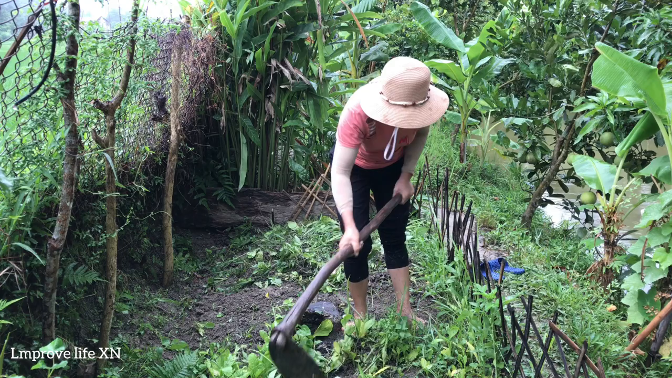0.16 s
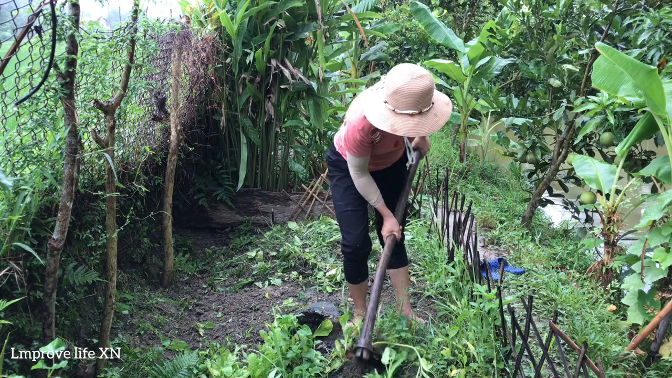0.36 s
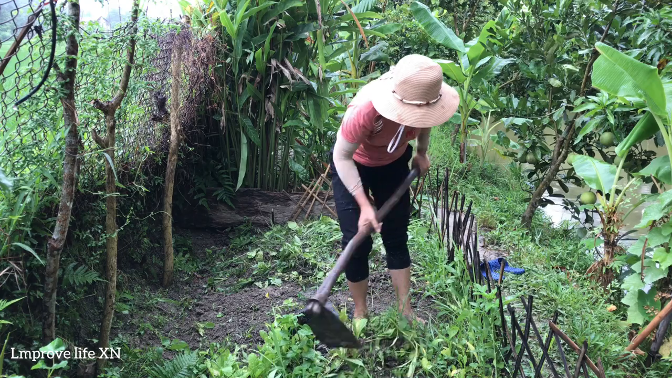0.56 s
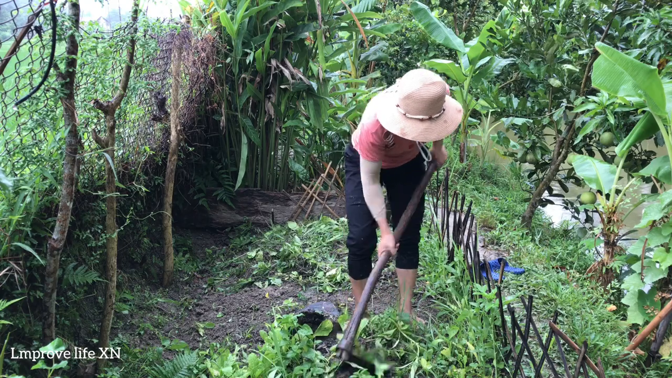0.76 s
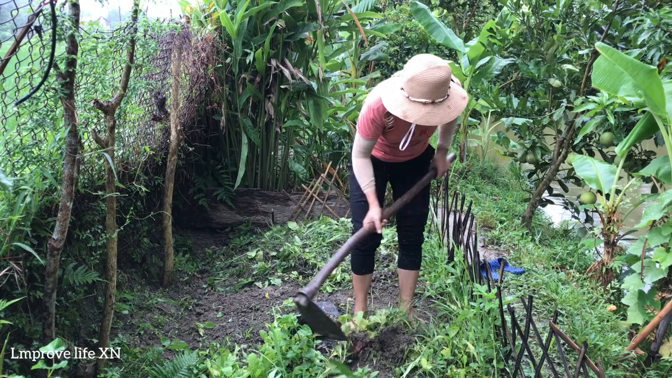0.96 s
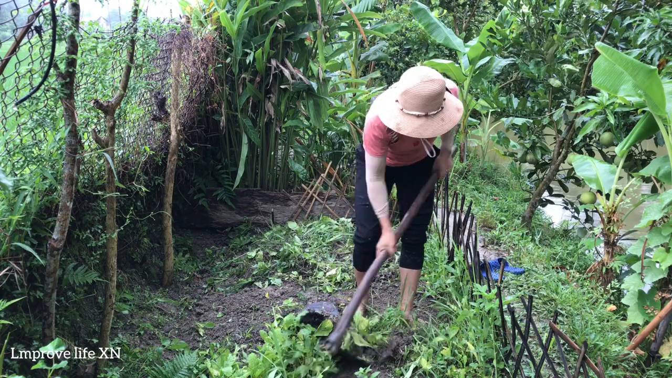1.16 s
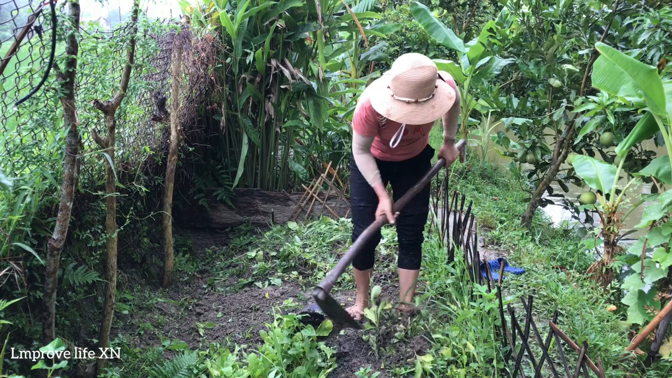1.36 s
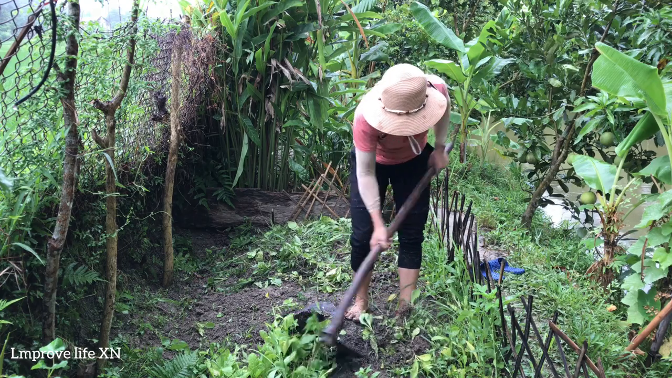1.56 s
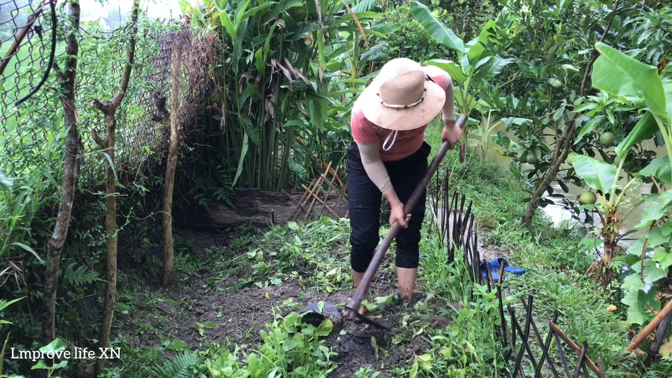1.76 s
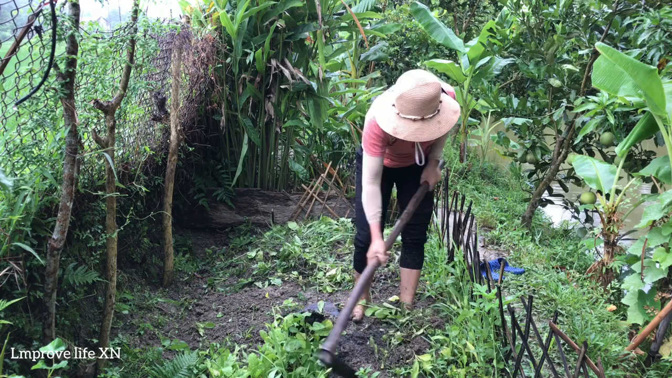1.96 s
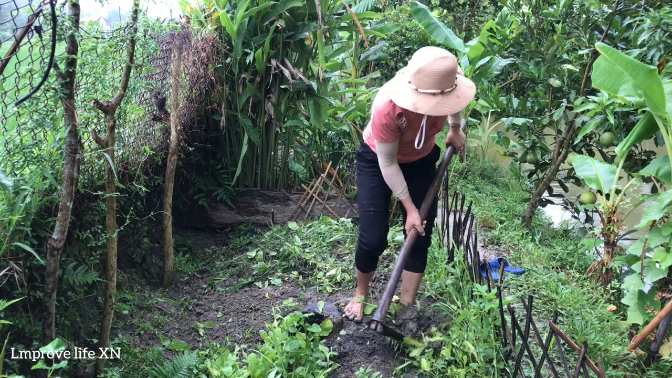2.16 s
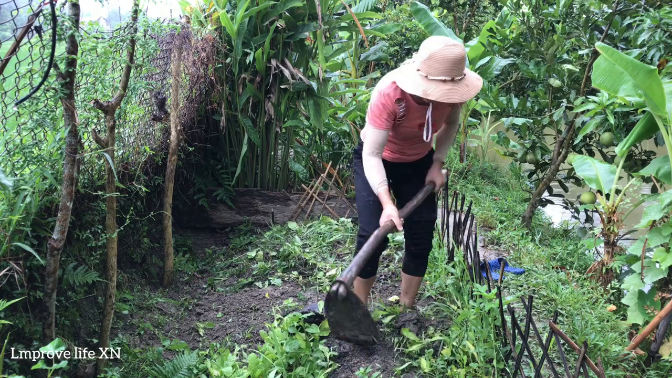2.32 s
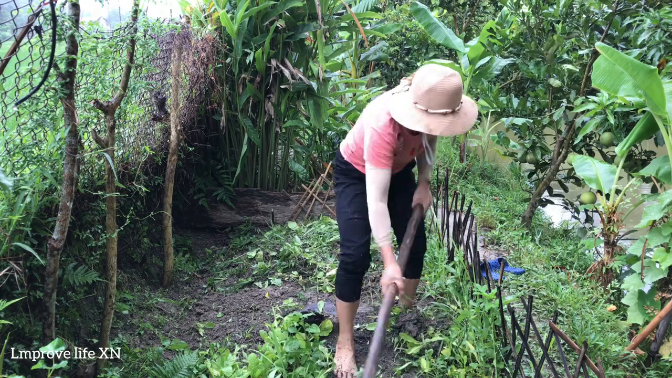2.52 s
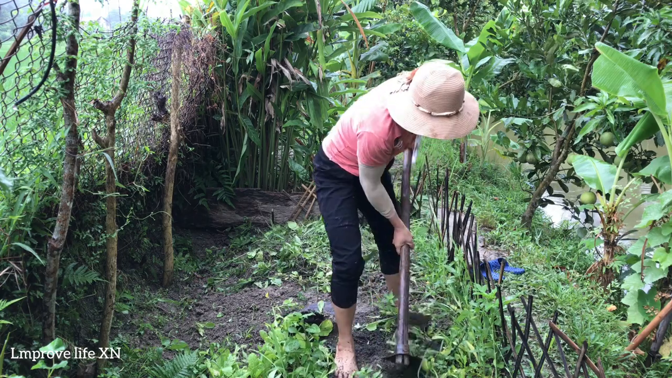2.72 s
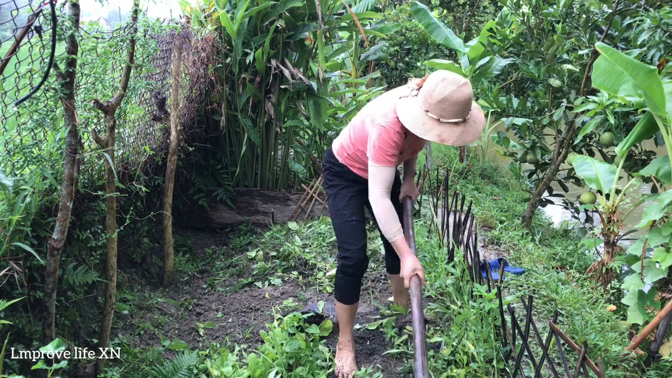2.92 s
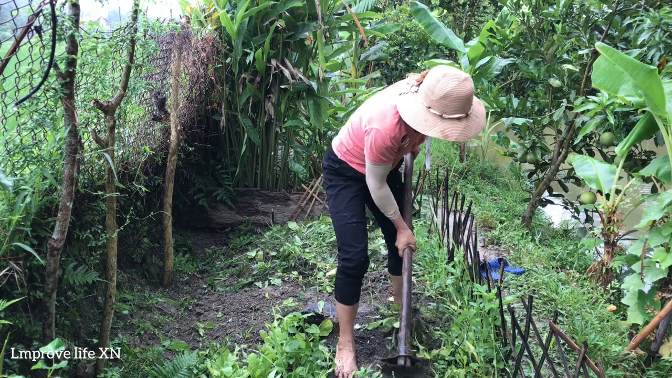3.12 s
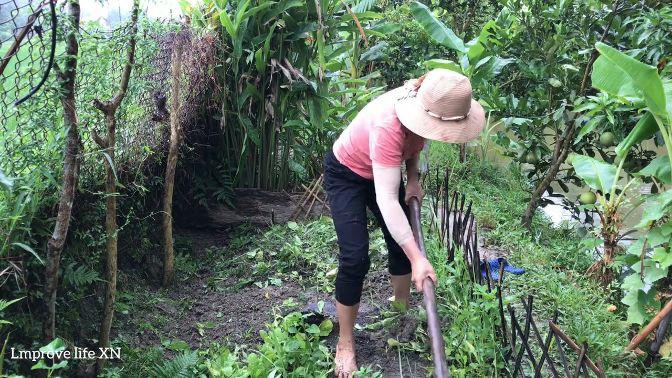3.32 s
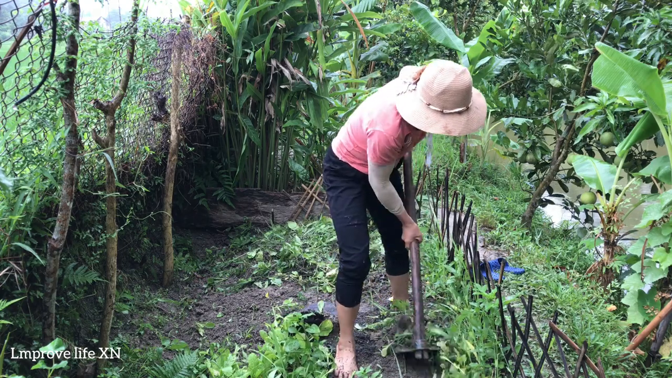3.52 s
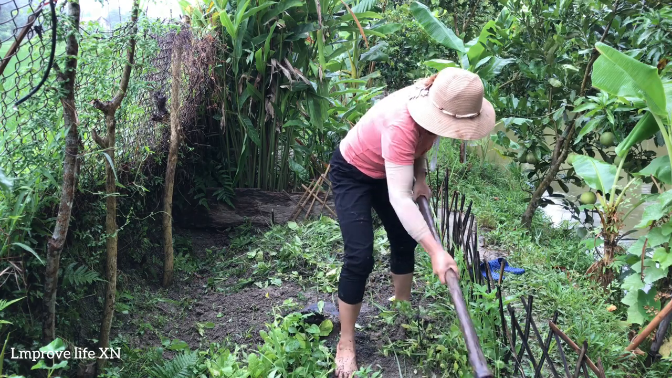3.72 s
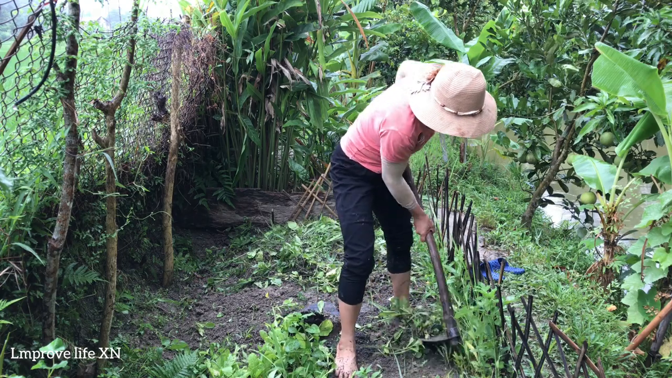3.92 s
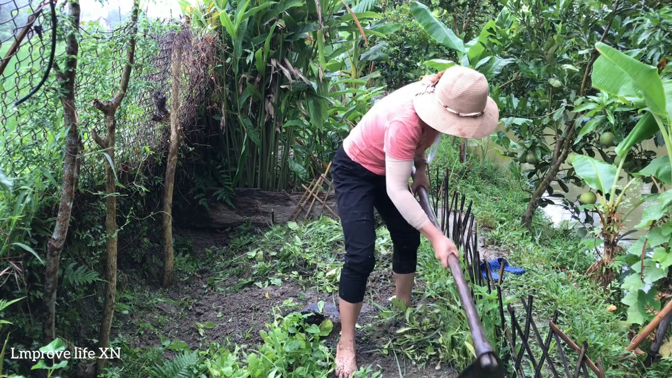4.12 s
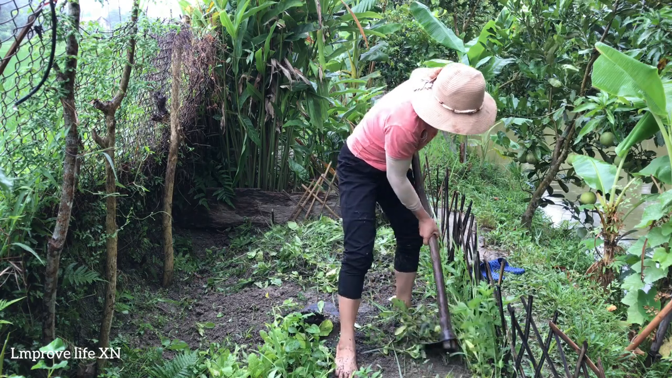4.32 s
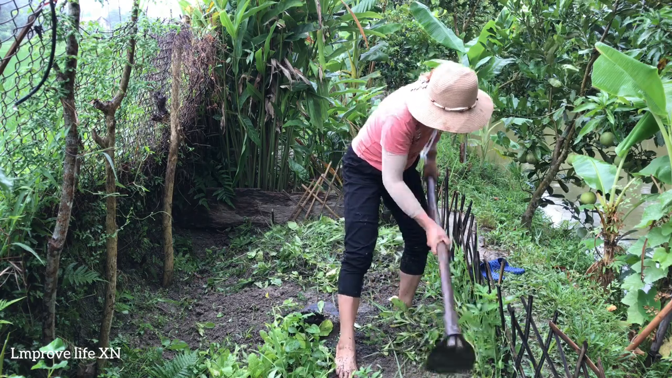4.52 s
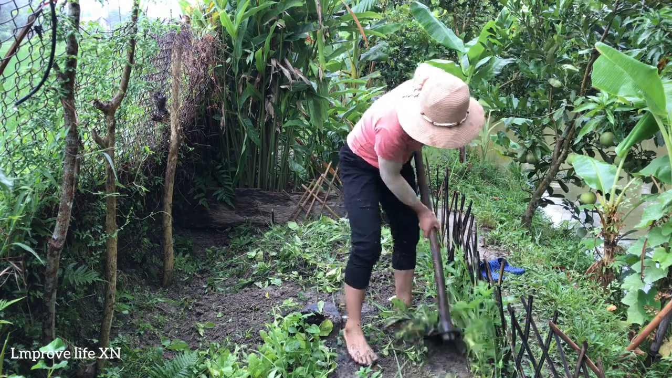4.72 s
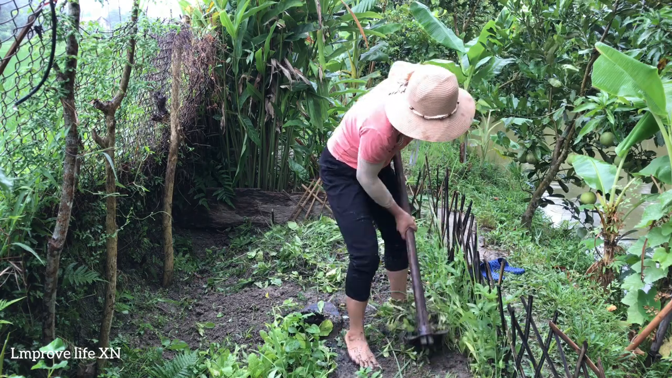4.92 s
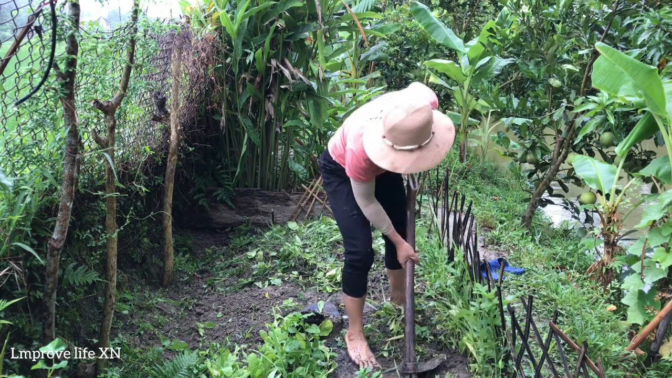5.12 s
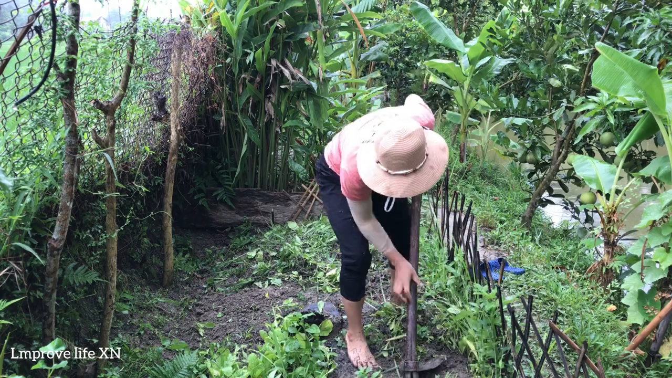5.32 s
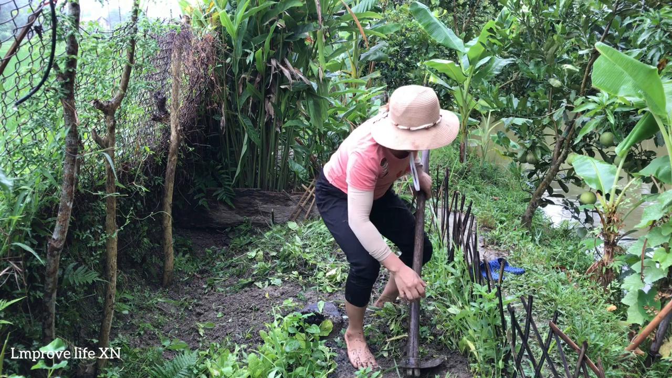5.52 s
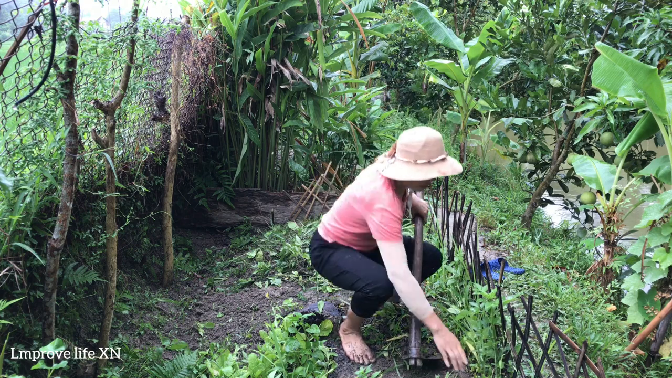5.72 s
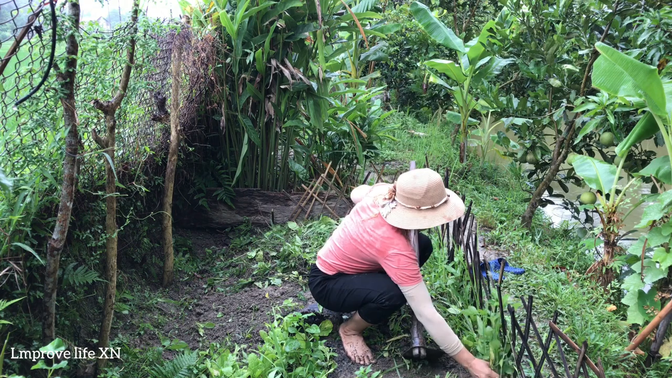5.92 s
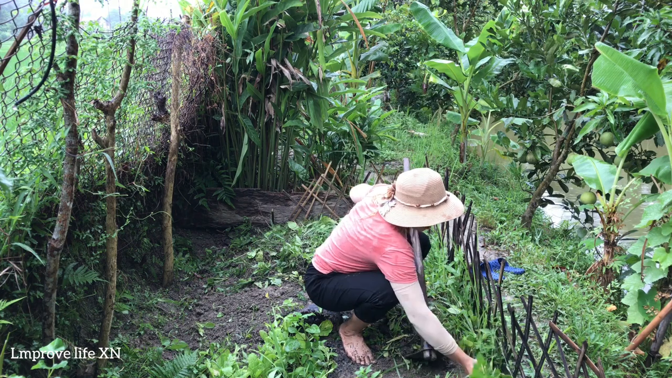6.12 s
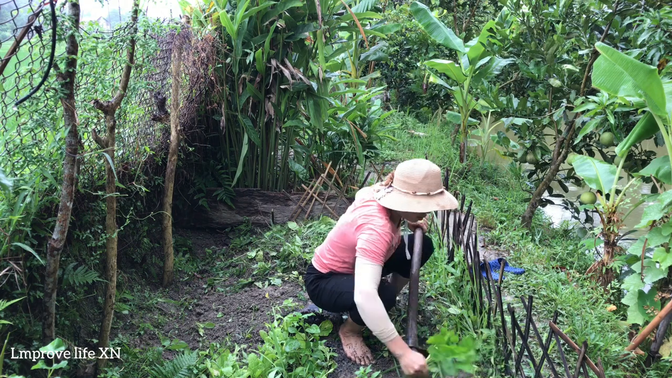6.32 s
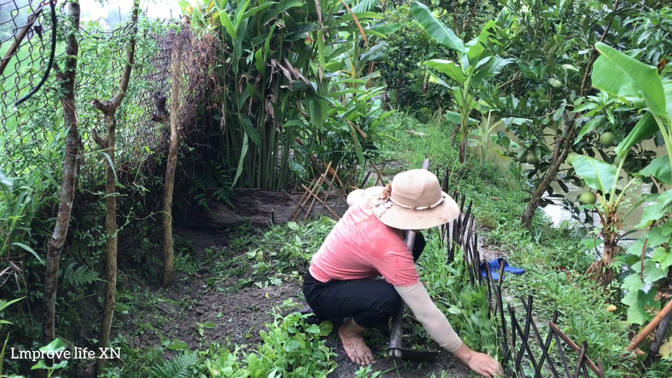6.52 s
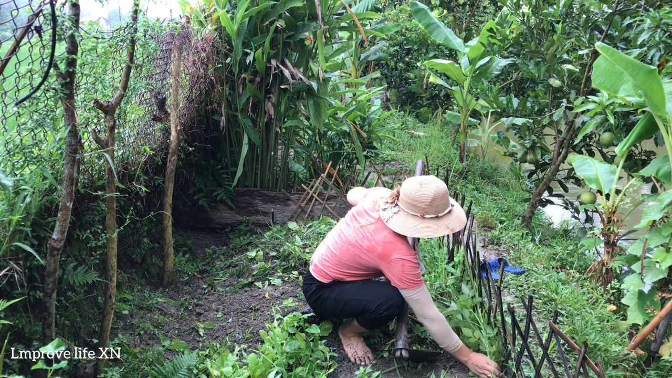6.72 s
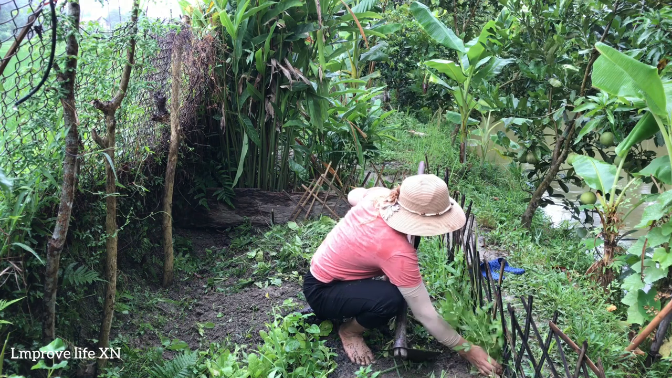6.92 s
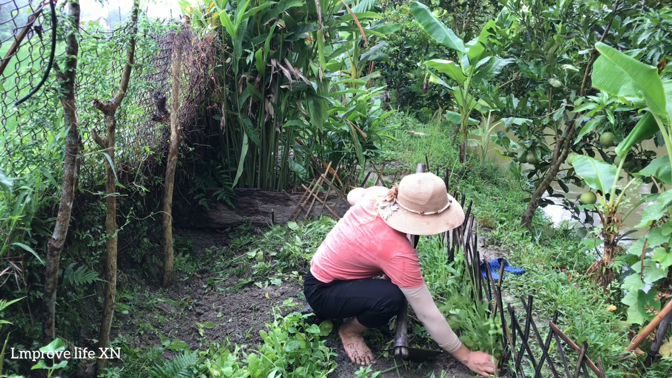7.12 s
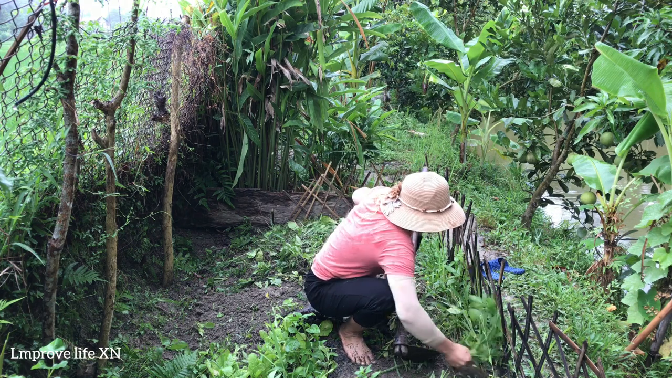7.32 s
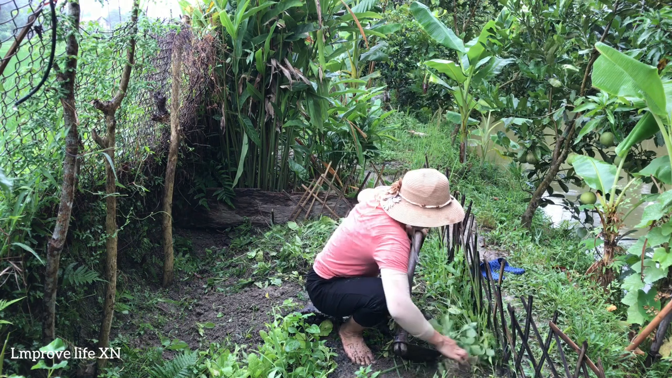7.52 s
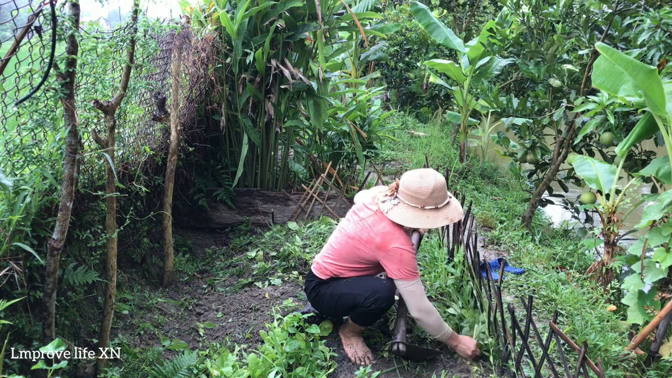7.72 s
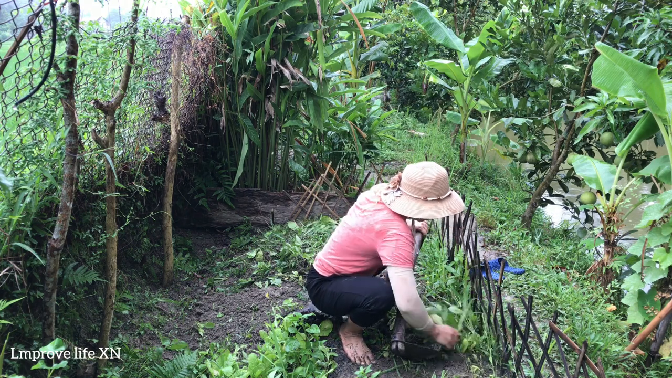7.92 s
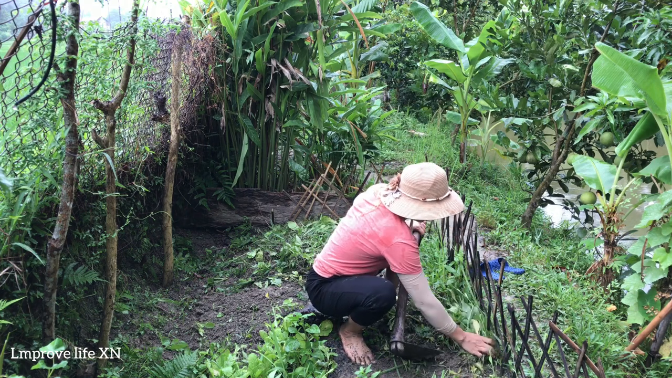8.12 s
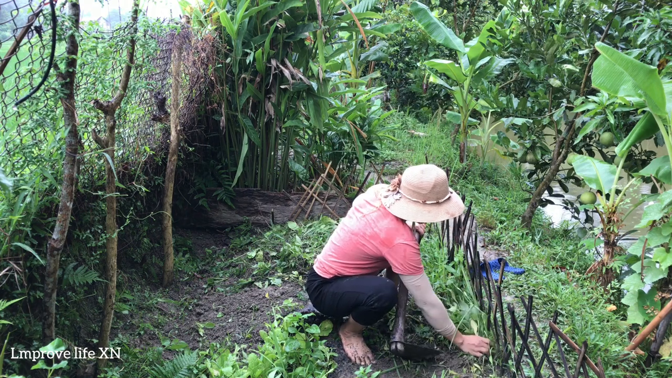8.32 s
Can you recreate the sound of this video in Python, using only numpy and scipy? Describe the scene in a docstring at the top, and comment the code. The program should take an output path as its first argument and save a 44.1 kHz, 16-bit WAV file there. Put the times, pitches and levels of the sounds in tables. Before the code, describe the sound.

Crunchy hoe strokes into earth with dull thuds and stony knocks, then quiet leaf rustling and stem snaps, over faint insects and a distant engine.

```python
"""Hoeing and weeding

A hoe chops eleven times through weeds into damp soil outdoors, then a hand pulls weeds.
Strokes and rustles are fractures and ringing crumbs, coloured as grit, clods and leaves and shaped in level.
Stems snap, stones knock the ringing steel blade, and the ground thuds and plops as damped low tones.
A small engine throbs far off as orders of its firing rate, under a noise bed of foliage and insects."""
import sys
import numpy as np
from scipy import signal
from scipy.fft import rfft, irfft, next_fast_len
from scipy.io import wavfile
from scipy.ndimage import uniform_filter1d

SR = 44100
rng = np.random.default_rng(int(sys.argv[2]) if len(sys.argv) > 2 else 0)


def transcribe(u):
    """Save the signal u as a 16-bit wav file named by the first command-line argument.

    u: samples, shape (n,) or (channels, n), limited to [-1, 1]; the rate is SR.
    q: integer samples, one column per channel.
    """
    v = np.clip(np.atleast_2d(u).T, -1, 1)
    q = np.round(v * 32767).astype(np.int16)
    wavfile.write(sys.argv[1], SR, q)


N = 368676  # samples


def gain_of(db):
    """Amplitude factor of a level in dB."""
    return 10 ** (np.asarray(db) / 20)


def evened(x):
    """Scales a signal to rms 1."""
    return x / np.sqrt(np.mean(x ** 2) + 1e-20)


def read(points, hz):
    """Reads a (frequency, level) curve along a logarithmic frequency axis."""
    f, value = np.transpose(points)
    return np.interp(np.log(hz + 1), np.log(f + 1), value)


def add(mix, s, sound):
    """Mixes a sound in at s seconds, cut off where the mix ends."""
    part = mix[round(s * SR):][:len(sound)]
    part += sound[:len(part)]


def coloured(x, spectrum):
    """Filters a signal by a (frequency [Hz], level [dB]) curve."""
    size = next_fast_len(len(x))
    gain = gain_of(read(spectrum, np.fft.rfftfreq(size, 1 / SR)))
    return irfft(rfft(x, size) * gain, size)[:len(x)]


def wander(hz):
    """Slow chance of rms 1, with hz random knots a second joined by straight lines."""
    knots = np.arange(0, N / SR + 1, 1 / hz)
    x = np.interp(np.arange(N) / SR, knots, rng.standard_normal(len(knots)))
    return evened(x - x.mean())


# Spectrum of the outdoor air, relative: (frequency [Hz], density [dB per Hz])
AIR_SPECTRUM = [(45, -20), (62, -5), (150, -1), (296, -10.5), (410, -10), (634, -14.5), (900, -14.5),
                (1180, -18.5), (1550, -16), (4480, -20), (5600, -19), (6400, -17), (7000, -21.5),
                (14800, -25.5), (16500, -36)]
# Swell of the air over its base level: (time [s], level [dB])
AIR_SWELL = [(0, 4), (2, 3), (4, 2.5), (6, 2.5), (7, 2.5), (8.36, 4)]
AIR_BASE_DB = -59


def air():
    """Foliage, insects and far rumble: random short-time spectra with drifting patches."""
    frames, hz = N // 256 + 5, np.fft.rfftfreq(1024, 1 / SR)
    real, imaginary, patches = rng.standard_normal((frames, 513, 3)).T
    patches = uniform_filter1d(patches, size=14, axis=0)  # across frequency
    patches = evened(uniform_filter1d(patches, size=12, axis=1))  # across time
    level_db = read(AIR_SPECTRUM, hz)[:, None] + 1.3 * patches
    spectra = (real + 1j * imaginary) * gain_of(level_db)
    noise = signal.istft(spectra, nperseg=1024, noverlap=768)[1][:N]
    swell_db = np.interp(np.arange(N) / SR, *np.transpose(AIR_SWELL)) + 0.48 * wander(8.9)
    return gain_of(AIR_BASE_DB + swell_db) * evened(noise)


def chips(lo_hz, hi_hz, cycles, per_s, spread_db):
    """Crumbs of 16 sizes, each ringing a few cycles at its own pitch."""
    out, draw = np.zeros(N), rng.random((2, N))
    at = np.flatnonzero(draw[0] < per_s / SR)
    kind = rng.integers(0, 16, N)
    for k, hz in enumerate(np.geomspace(lo_hz, hi_hz, num=16)):
        turns = np.arange(int(3 * cycles * SR / hz) + 2) * hz / SR
        train, mine = np.zeros(N), at[kind[at] == k]
        train[mine] = gain_of(-spread_db * np.log(draw[1, mine] + .02))  # a few land much louder
        chip = turns * np.exp(-3 * turns / cycles) * np.sin(2 * np.pi * turns)
        out += signal.oaconvolve(train, chip / np.linalg.norm(chip))[:N]
    return evened(out)


def garden():
    """Loose crumbs roll and leaves tick all the while, sparse and faint."""
    return gain_of(-70 + 3.2 * wander(12)) * chips(1490, 12100, 3.7, 500, 4.2)


# Far engine, level before a common trim: (time [s], firing rate [per s], level [dB])
ENGINE = [(0, 29.2, -54), (.42, 28.9, -52.5), (.95, 29.5, -54), (3.1, 30.1, -56), (4.2, 29.3, -57.5),
          (4.9, 29.5, -59.5), (6.4, 28.8, -61), (7.5, 28.4, -61), (8.36, 28.5, -59)]
# Orders of the exhaust, relative: (multiple of the firing rate [-], level [dB])
EXHAUST_ORDERS = [(1, -46), (2, -8.5), (3, -16), (4, -4), (5, 1.5), (6, 1.5), (7, -1), (8, -10.5), (9, -17)]
ENGINE_TRIM_DB = -1.6


def engine():
    """Exhaust pulses as orders of the firing rate, each wavering on its way through the air."""
    s, hz, db = np.transpose(ENGINE)
    t = np.arange(N) / SR
    firing_hz = np.interp(t, s, hz) * (1 + 0.00603 * wander(11))
    turns = np.cumsum(firing_hz) / SR
    orders = np.zeros(N)
    for k, order_db in EXHAUST_ORDERS:
        level = gain_of(order_db + 1.75 * wander(8))
        orders += level * np.cos(2 * np.pi * k * turns + 0.095 * k * wander(4.4))
    return gain_of(np.interp(t, s, db) + ENGINE_TRIM_DB) * evened(orders)


def crackle(per_s, spread_db, clump_db):
    """Tiny fractures of uneven size that come in clumps a few milliseconds long."""
    draw = rng.random((3, N))
    size = gain_of(-spread_db * np.log(draw[0] + 0.0018)) * np.sign(draw[1] - .5)
    struck = draw[2] < per_s / SR
    return evened(size * struck * gain_of(clump_db * wander(320)))


ENTRY_S, STOP_DB_PER_S = 0.004, 700  # rise at entry, steepness of the drop after the stop
SPILL_SAG_DB, SETTLE_S, CRUMBS_DB, CRUMBS_S, SILENT_DB = 6.5, 0.027, -64, 0.13, -98
CLODS_CUT_DB, CLODS_SPILL_DB = -3.5, -4  # clods break mostly where the blade stops
LEAVES_CUT_DB, LEAVES_STOP_DB, LEAVES_SPILL_DB = 5, -2.5, 0.5  # against grit


def stroke(stop, force_db, cut, entry_db, hold, spill_db, spill, clods_db):
    """Corners of grit, clod and leaf level through one stroke: entry, cut, stop, spill, last crumbs."""
    drop = max(force_db - spill_db, 1) / STOP_DB_PER_S
    s = np.cumsum([stop - cut - ENTRY_S, ENTRY_S, cut, hold, drop, spill, SETTLE_S, CRUMBS_S])
    grit = np.array([SILENT_DB, entry_db, force_db, force_db,
                     spill_db, spill_db - SPILL_SAG_DB, CRUMBS_DB, SILENT_DB])
    phase = np.array([0, 0, 1, 1, 2, 2, 2, 2])  # cut, stop, spill
    clods = clods_db + np.array([CLODS_CUT_DB, 0, CLODS_SPILL_DB])[phase]
    leaves = np.array([LEAVES_CUT_DB, LEAVES_STOP_DB, LEAVES_SPILL_DB])[phase]
    return s, grit, grit + clods, grit + leaves


RUSTLE_RANGE_DB = 20  # from the foot of a swell to its top


def rustle(s, force_db, swell, fade, clods_db, leaves_db):
    """Corners of grit, clod and leaf level through one rustle: a swell and a fade."""
    grit = force_db - RUSTLE_RANGE_DB * np.array([1, 0, 1])
    return np.array([s - swell, s, s + fade]), grit, grit + clods_db, grit + leaves_db


# The blade cuts in with growing force, stops, and loose soil spills: (stop time [s], force [dB],
# cut [s], force at entry [dB], hold [s], spill [dB], spill [s], clods against grit [dB], thud [dB])
STROKES = [(.319, -39, 0.079, -63.5, 0.0053, -51, 0.079, -3, -28.5),
           (0.762, -54, 0.029, -63, 0.063, -61, 0.057, 1, -32.5),
           (1.177, -37.5, 0.045, -69, .006, -47, .04, -4.5, -33),
           (1.602, -38, 0.0037, -62, 0.005, -51.5, 0.071, -3.5, -44),
           (2.027, -47.5, 0.0068, -48.5, 0.031, -51, 0.028, -2.5, -47),
           (2.573, -37.5, 0.047, -52, 0.017, -50.5, 0.034, -6, -41),
           (3.009, -42.5, 0.048, -54.5, 0.0091, -52, 0.035, -2.5, -36),
           (3.409, -36, 0.044, -59.5, 0.003, -49, 0.07, -4.5, -37),
           (3.812, -40, 0.032, -60, .03, -42, 0.051, -6, -46),
           (4.26, -41.5, 0.073, -66.5, 0.0077, -48.5, 0.05, -2, -46),
           (4.681, -43.5, 0.044, -68, 0.0094, -51.5, 0.067, -4.5, -41)]
# Weeds are brushed, tugged and dropped: (time of the top [s], force [dB], swell [s], fade [s],
# clods against grit [dB], leaves against grit [dB])
RUSTLES = [(.68, -53, .008, 0.061, -19, -17), (1.558, -50.5, .015, 0.09, -1.5, 0.5),
           (1.779, -56, 0.024, .12, -5, -20), (2.658, -49, .02, 0.035, -5, -15),
           (3.62, -62, 0.097, 0.18, -1, -2), (3.74, -60, 0.051, 0.049, 0, -16),
           (4.04, -60, 0.06, 0.077, -24, 8.5), (4.11, -54, .02, 0.02, -21, -2),
           (4.899, -58, .02, 0.036, -15, -4), (4.98, -59, 0.016, .04, -4, -18),
           (5.134, -66, 0.015, 0.049, -3, -19), (5.66, -64, .08, 0.044, -15, 0),
           (5.78, -60, 0.044, 0.043, -15, 4), (6.0, -69, .1, 0.098, -10, 11),
           (6.12, -57, 0.14, 0.026, -9, 1), (6.158, -60, 0.01, 0.032, 8, 14),
           (6.254, -60, 0.065, 0.063, -8, 5), (6.5, -60, 0.067, 0.08, -10, 0),
           (6.595, -56.5, .01, 0.051, -16, -4), (7.323, -54.5, 0.06, 0.089, -5, -4),
           (7.397, -57, 0.073, 0.07, -25, 4.5), (7.61, -63, .02, .04, -6, -8),
           (7.743, -56, 0.21, .08, -16, 1), (7.892, -58, 0.2, 0.046, -23, 5),
           (7.939, -47.5, 0.018, 0.032, -24, -5), (7.962, -58.5, 0.0072, 0.059, 9, -12),
           (7.995, -57, 0.037, .04, 7.5, -18), (8.05, -63, 0.047, .04, 9.5, -13),
           (8.09, -62, 0.036, .04, 4, -18), (8.135, -61, .03, 0.045, 9, -21),
           (8.195, -57, 0.055, 0.029, -7, -23), (8.29, -54.5, .08, 0.067, -15, 1)]
# Colour of crushed grit: (frequency [Hz], level [dB])
GRIT = [(700, -41), (1200, 1), (1600, 1), (2500, 0.5), (4000, 4.5), (5500, 2), (8000, -5), (12000, -5)]
# Colour of breaking clods: (frequency [Hz], level [dB])
CLODS = [(120, -18), (300, -5), (500, -7), (850, 6), (1200, -13), (1800, -5.5), (3000, -10)]
# Colour of tearing leaves: (frequency [Hz], level [dB])
LEAVES = [(3000, -11), (5000, -1), (7000, 0), (10000, 4), (13000, -4.5), (16000, 0)]


def crunch():
    """Strokes and rustles crush grit, clods and leaves, each with its own grain and colour."""
    t, levels = np.arange(N) / SR, np.zeros((3, N))
    gestures = [stroke(*row[:-1]) for row in STROKES] + [rustle(*row) for row in RUSTLES]
    for s, *dbs in gestures:
        a, b = round(s[0] * SR), min(round(s[-1] * SR), N)
        for k, db in enumerate(dbs):
            level = gain_of(np.interp(t[a:b], s, db))
            levels[k, a:b] = np.hypot(levels[k, a:b], level)  # overlapping gestures add in power
    shared = crackle(7000, 2.6, 2.0)  # a fracture is heard in all three
    tearing = shared + 1.7 * crackle(8500, 1.5, 3.8)
    grit = evened(coloured(shared, GRIT)) + 0.83 * chips(1377, 6420, 7.5, 2500, 4.7)
    clods = evened(coloured(shared, CLODS)) + 0.79 * chips(289, 1370, 1.0, 900, 0.93)
    leaves = evened(coloured(tearing, LEAVES)) + 0.48 * chips(5780, 13800, 13.0, 3000, 7.2)
    return sum(level * evened(x) for level, x in zip(levels, (grit, clods, leaves)))


# Stems snap and pebbles click: (time [s], peak [dB], pitch [Hz], crack against ring before a lift [dB])
SNAPS = [(0.3014, -27, 9550, -3), (0.3141, -19, 1440, 13), (0.3177, -10.5, 10060, -15),
         (.3246, -24, 2620, -15), (0.372, -39, 2060, -6), (.529, -49, 1454, -18), (0.6733, -41, 4400, -8),
         (.688, -42, 5150, -8), (.7389, -39, 3900, 2), (.7608, -31, 2500, 7), (1.348, -44.5, 1640, -12),
         (1.496, -39.5, 3900, 7), (1.552, -36.5, 4260, -3), (2.021, -33.5, 1370, 2),
         (2.0574, -36.5, 1640, -17), (2.203, -46, 3040, -2), (2.528, -32, 10800, 1),
         (2.5842, -28, 1704, -6), (2.6442, -37.5, 2130, -13), (2.9574, -32, 12800, -3),
         (3.02, -31, 1530, -1), (3.0658, -36, 3560, 2), (3.157, -39.5, 4880, -6), (3.26, -50, 1640, -19),
         (3.3782, -39, 2040, 10), (3.7758, -33.5, 8660, -1), (3.8155, -35, 1470, -6),
         (3.838, -38, 3160, -13), (4.235, -27, 4400, -2), (4.651, -38, 10500, 0), (4.6764, -34.5, 1480, 1),
         (4.692, -29, 4560, -10), (4.883, -35.5, 3980, 12), (5.125, -41.5, 2700, -4),
         (5.135, -41, 3660, -9), (5.2834, -46.5, 1480, 4), (5.449, -41, 8920, -4),
         (5.6416, -40.5, 10150, -2), (5.989, -38, 11200, -3), (6.075, -41, 8000, 8), (6.1183, -39, 6940, 4),
         (6.1272, -35, 5200, -1), (6.1462, -32, 7500, 6), (6.1554, -31, 3080, 17), (6.251, -37.5, 4140, 6),
         (6.365, -45.5, 2220, 6), (6.508, -42, 5500, 6), (6.666, -47, 2230, 6), (7.305, -33, 12600, -1.5),
         (7.318, -34, 8900, 1), (7.3383, -33, 8200, 0), (7.394, -43, 2300, -18), (7.7794, -37, 10970, -7),
         (7.892, -39, 5200, -6), (7.932, -28, 4600, -2.5), (8.133, -45, 2030, -12), (8.197, -43, 2760, -13),
         (8.306, -47, 1830, -20)]
SNAP_T60_S, SNAP_PIECE_HZ, SNAP_SIZE_LAW = 0.037, 2500, 0.76  # small pieces die sooner
SNAP_DB_SHORTENS, CRACK_LIFT_DB = 0.04, 3  # hard snaps die sooner


def snaps():
    """A wide crack of splintering fibres and a short ring at the pitch of the piece that broke."""
    out, t = np.zeros(N), np.arange(4000) / SR
    noises = rng.standard_normal((len(SNAPS), 2, len(t)))
    for (s, db, hz, crack_db), noise in zip(SNAPS, noises):
        t60 = SNAP_T60_S * (SNAP_PIECE_HZ / hz) ** SNAP_SIZE_LAW
        t60 *= np.exp(-SNAP_DB_SHORTENS * (db + 36))
        dying = gain_of(-60 * t / max(t60, .002)) * np.minimum(t / (.02 * t60), 1)
        rough = 1 + 0.68 * evened(uniform_filter1d(noise[0], size=40))
        band = [0.24 * hz, min(2.34 * hz, 18000)]
        crack = signal.sosfilt(signal.butter(2, band, "band", fs=SR, output="sos"), noise[1])
        ring = rough * np.sin(2 * np.pi * hz * t)
        snap = (ring + gain_of(crack_db + CRACK_LIFT_DB) * evened(crack)) * dying
        add(out, s, gain_of(db) * snap / abs(snap).max())
    return out


# Modes of the free steel blade: (frequency [Hz], level before brightness tilt [dB], free ring t60 [s])
BLADE = [(1480, 2.5, 0.031), (1874, 10.5, 0.013), (2470, 11.5, 0.016), (3160, 1.5, 0.013),
         (3746, 15, 0.017), (5200, 11, 0.029), (6450, -8, 0.013), (8140, 15, 0.013), (8000, -1, 0.053),
         (9550, 9, 0.017), (10500, 3, .02), (12100, -13, .02)]


def blade(tilt_db, ring):
    """The answer of the steel to one tap; soil around it shortens the ring."""
    t = np.arange(3000) / SR
    answer = np.zeros(len(t))
    for hz, db, t60 in BLADE:
        mode_db = db + tilt_db * np.log2(hz / 3000) - 60 * t / (t60 * max(ring, .1))
        answer += gain_of(mode_db) * np.sin(2 * np.pi * hz * t)
    return answer


# The blade meets a stone: (time [s], peak before the bass cut [dB], brightness [dB per octave], contact [ms])
KNOCKS = [(0.3183, -9.5, -1.5, 1.1), (1.179, -17, 18, 0.13), (1.6037, -23, -4, 1.2), (2.567, -17, 6, 0.79),
          (3.001, -19.5, 12, 1.3), (3.0044, -17, -12, 0.74), (3.4133, -19, -17, 0.41),
          (4.2613, -9, -0.9, 1.8)]
BURIED_RING, RING_PER_MS = 0.21, .2  # share of the free ring time; a long contact leaves the blade freer


def knocks():
    """The stone cracks while the contact lasts and the blade rings on; the knocks carry no bass."""
    out, t = np.zeros(N), np.arange(400) / SR
    noises = rng.standard_normal((len(KNOCKS), len(t)))
    for (s, db, tilt_db, ms), noise in zip(KNOCKS, noises):
        contact = noise * (t / ms) * np.exp(-2000 * t / ms)
        contact /= abs(contact).max()
        taps = np.eye(1, len(t))[0] + 0.17 * contact  # the first touch, then chatter
        steel = np.convolve(taps, blade(tilt_db, BURIED_RING + RING_PER_MS * ms))
        blow = steel / abs(steel).max()
        add(blow, 0, gain_of(2.5 * tilt_db - 5) * contact)  # bright knocks crack more
        add(out, s, gain_of(db) * blow / abs(blow).max())
    return signal.sosfilt(signal.butter(3, 1150, "high", fs=SR, output="sos"), out)


def thump(db, hz, t60, rise_ms):
    """A soft low blow that swells for a few milliseconds."""
    t = np.arange(9000) / SR
    rise = 1 - np.exp(-(1000 * t / rise_ms) ** 2)
    return gain_of(db - 60 * t / t60) * rise * np.sin(2 * np.pi * hz * t)


def plop(s, db, swell, fade, first_hz, last_hz):
    """Start time and sound of a bell-shaped swell of one sliding tone."""
    t = np.arange(-swell, fade, 1 / SR)
    hz = np.geomspace(first_hz, last_hz, len(t))
    bell_db = -30 * np.abs(t / np.where(t < 0, swell, fade)) ** 1.5
    return s - swell, gain_of(db + bell_db) * np.sin(2 * np.pi * np.cumsum(hz) / SR)


# Hollow plops near the ground as clods tear loose and drop, each sliding in pitch:
# (loudest time [s], peak [dB], swell [s], fade [s], first pitch [Hz], last pitch [Hz])
DROPS = [(7.985, -44, .012, .015, 400, 300), (8.003, -44, 0.0368, 0.054, 189, 105),
         (8.1, -44.5, .02, 0.021, 169, 260), (8.119, -36, .012, 0.012, 316, 390)]
THUD_HZ, THUD_T60_S, THUD_RISE_MS = 89.6, 0.059, 4.3
THUD_LAG_S, THUD_LAG_PER_HOLD = 0.0024, 0.18  # the ground answers once the blade has sunk in


def thuds():
    """The ground thuds where the blade stops; loose clods plop."""
    out = np.zeros(N)
    for stop, _, _, _, hold, *_, thud_db in STROKES:
        lag = THUD_LAG_S + THUD_LAG_PER_HOLD * hold
        add(out, stop + lag, thump(thud_db, THUD_HZ, THUD_T60_S, THUD_RISE_MS))
    for row in DROPS:
        add(out, *plop(*row))
    return out


def scene():
    """All layers summed into one channel."""
    background = air() + garden() + engine()
    work = crunch() + snaps() + knocks() + thuds()
    return (background + work)[None]


EDGE_HZ = 15850  # upper band limit


def record(dry):
    """The microphone drops the deepest bass; then a steep low-pass sets the band limit."""
    low_cut = signal.sosfilt(signal.butter(4, 60, "high", fs=SR, output="sos"), dry)
    low_pass = signal.firwin(511, EDGE_HZ, window=("kaiser", 9), fs=SR)
    return signal.oaconvolve(low_cut, low_pass[None], "same")


dry = scene()
out = record(dry)
transcribe(out)
```